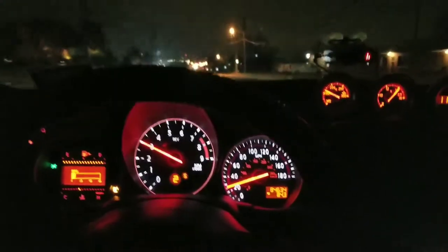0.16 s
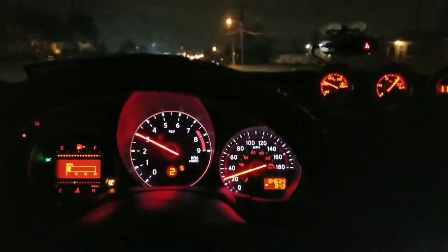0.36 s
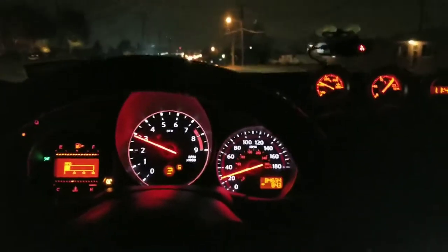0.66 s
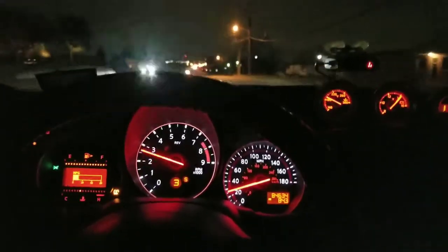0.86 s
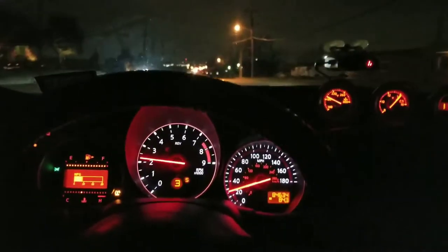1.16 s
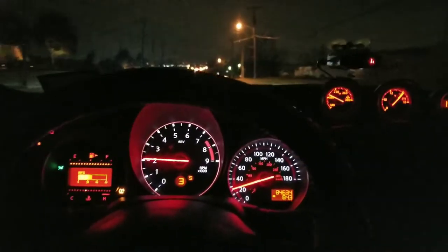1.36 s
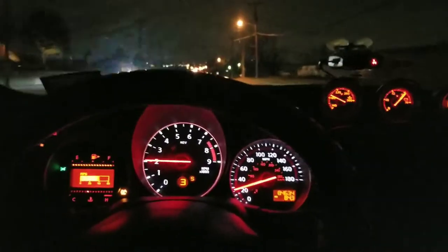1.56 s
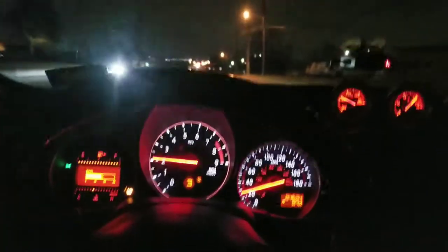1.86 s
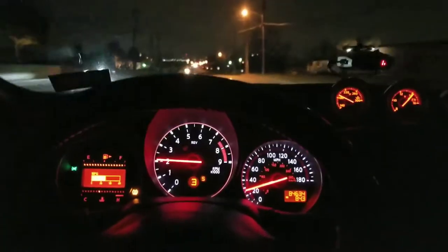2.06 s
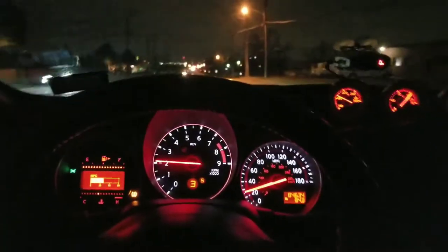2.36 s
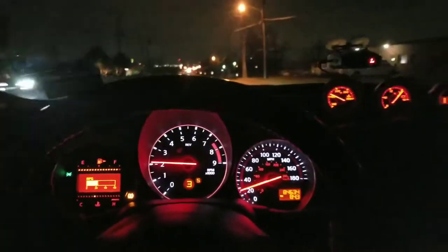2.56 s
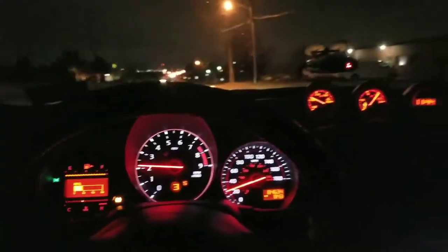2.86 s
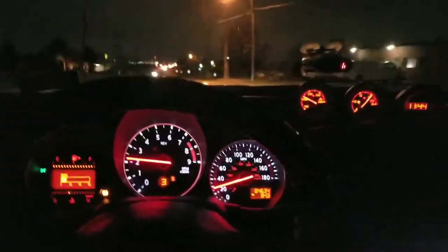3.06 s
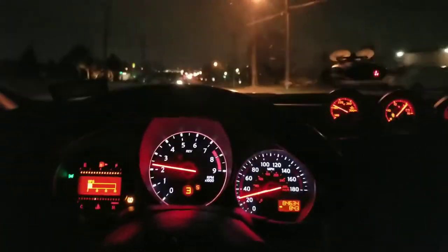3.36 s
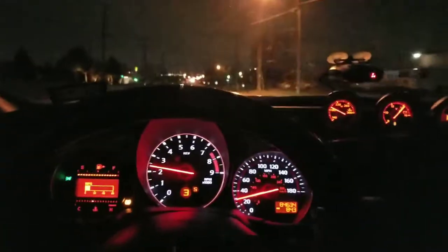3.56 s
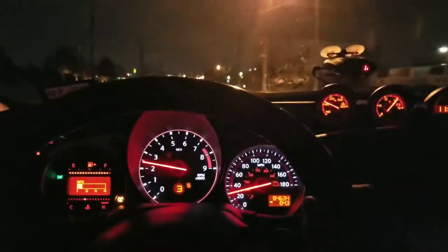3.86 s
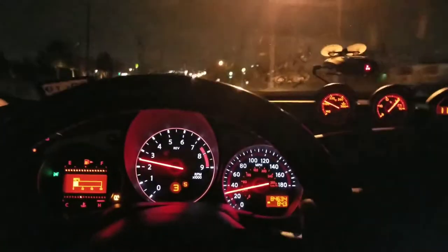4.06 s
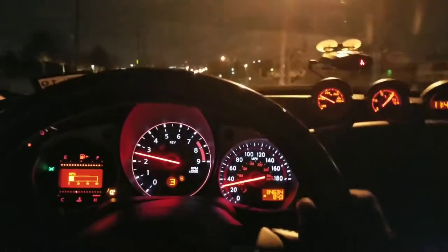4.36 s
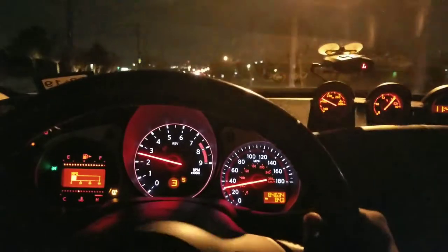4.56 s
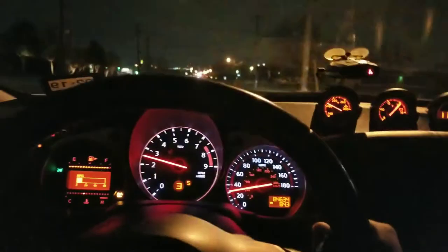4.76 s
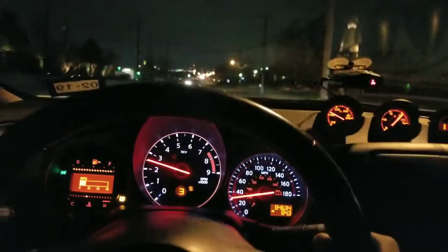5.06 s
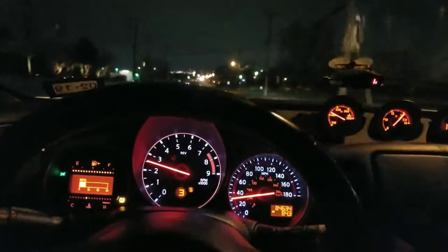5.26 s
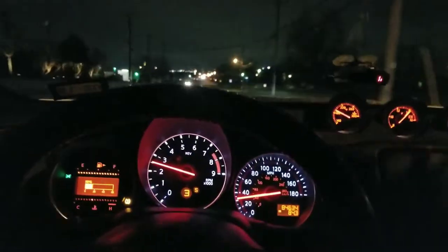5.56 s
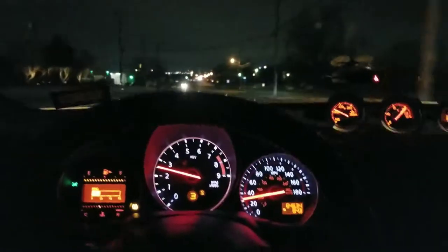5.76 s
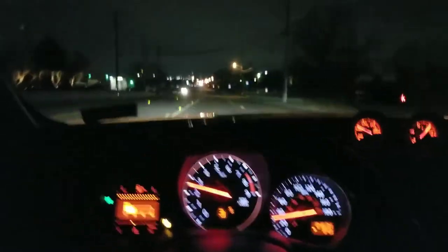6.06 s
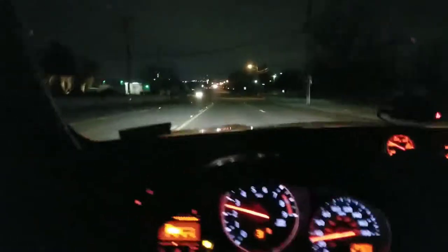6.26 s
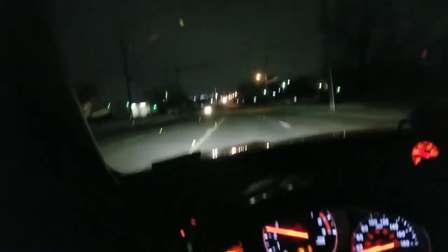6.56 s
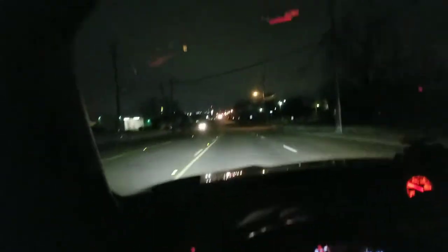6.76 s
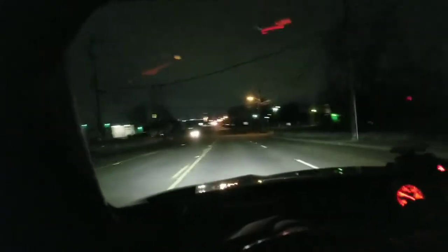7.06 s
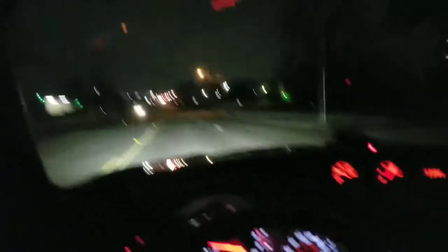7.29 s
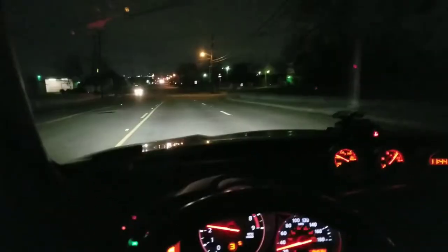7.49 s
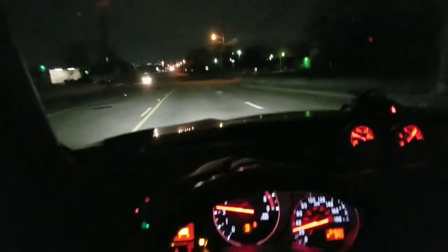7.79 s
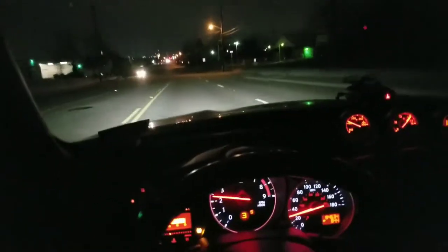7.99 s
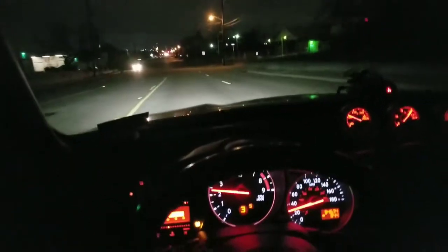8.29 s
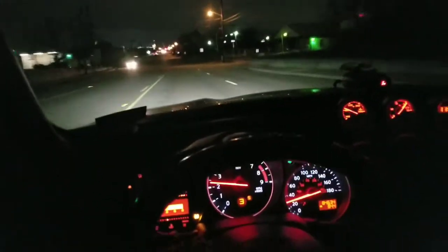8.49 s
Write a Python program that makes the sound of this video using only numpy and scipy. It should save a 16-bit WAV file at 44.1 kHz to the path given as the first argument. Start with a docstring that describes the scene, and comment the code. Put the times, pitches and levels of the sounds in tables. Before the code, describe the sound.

Booming engine drone in a car cabin, pops as revs fall, smooth pull upward, then throttle lift with rasp, trim rattle and handling ticks.

```python
"""A six-cylinder engine with a loud exhaust, heard inside the car: the revs fall through a gear change with pops
in the pipe and a lumpy coast, climb again, then sag slowly off the throttle as the note turns raspy and the trim buzzes.
The engine is a low boom, pulse trains ringing in the pipe, and noise for gas and trim; each pop is a noise burst.
Road rumble and a thin hiss are filtered noise; a hand-held device ticks and rustles now and then in noise bursts."""
import sys
import numpy as np
from scipy import signal
from scipy.fft import rfft, irfft, next_fast_len
from scipy.io import wavfile
from scipy.ndimage import uniform_filter1d, map_coordinates

SR = 44100
rng = np.random.default_rng(int(sys.argv[2]) if len(sys.argv) > 2 else 0)


def decibels_to_gain(level_db):
    """Convert a level in decibels to a linear amplitude gain (20 dB per decade)."""
    exponent = np.asarray(level_db, float) / 20
    return 10 ** exponent


def generate_wav(sig):
    """Save sig (samples, or channels by samples) to the path in sys.argv[1] as 16-bit PCM at SR."""
    pcm = np.round(np.clip(np.atleast_2d(sig).T, -1, 1) * 32767).astype(np.int16)
    wavfile.write(sys.argv[1], SR, pcm)


N = 380583  # length in samples

# relative pulse strength of each cylinder, in firing order
CYLINDERS = [0.84, 1, .4, 0.14, 0.33, 0.014]
# the note is dull under throttle and brightens as it lifts: (t/s, slope above 540 Hz/dB per octave)
BRIGHTNESS = [(0, -7), (.4, -6.5), (.7, -3), (.95, -1), (1.3, -11.5), (2.3, -9.5), (2.7, -7), (3.05, -7),
              (3.2, -14), (4, -11.5), (5, -7.5), (5.5, -5), (5.9, 3), (6.45, 3), (7, .3), (7.6, 0),
              (8.3, -3), (8.45, -7), (8.63, -10)]
# the pulses in the pipe: (t/s, strength/dB, even part over the uneven part/dB)
PULSES = [(0, -35, -12), (.6, -38, -7.5), (1, -26, -8), (1.4, -43.5, -6), (1.9, -47, -6), (2.2, -44, -3.5),
          (2.5, -33, -.5), (2.8, -30.5, 5), (3.02, -32, 2), (3.15, -33.5, -5), (3.5, -29, -9.5),
          (4.2, -32, -11), (5, -32, -8.5), (5.35, -22.5, -3.5), (5.8, -24, -1.5), (6.1, -21, -2.5),
          (6.55, -19, -10.5), (7.2, -22.5, -7), (8, -24.5, -9), (8.63, -23.5, -12)]
# tones that change with speed: (firings per second, throb at 7/6 of the firing rate/dB,
# second harmonic over the pulses/dB, low burble over the pulses/dB); brightness alters throb and burble further
SPEED_TONES = [(95, -41.5, 8.5, 12), (106.7, -42, 6.5, 3.5), (108.6, -36, 0.5, 0.5), (115.6, -29, 1.5, -3),
               (120.9, -28, 0.5, -4), (123.9, -30, -5, -1), (138, -35.5, 6, 4), (147, -46, 6, -2)]
# swells of gas rush and trim buzz, some abrupt, some gradual:
# (t/s, gas level/dB, buzz level/dB, rise over 20 dB/s, fading of the buzz/dB per s)
SURGES = [(.49, -45, -72, .12, 120), (.8, -42, -64, .03, 80), (.93, -45, -49, .12, 73),
          (1.24, -43, -59.5, .5, 200), (2.7, -50, -58, .9, 14), (5.78, -44, -56, .15, 20),
          (5.875, -34.5, -39, .03, 20), (8.399, -36.5, -55.5, .03, 402)]
# resonances of the buzzing trim: (f/Hz, width/Hz, level per pass/dB)
TRIM = [(1860, 640, -1.5), (2600, 560, 3), (3700, 630, -2), (4520, 560, 0.5), (5500, 1500, -1),
        (7380, 1700, -4.5)]


def unit(x):
    """Scaled to rms 1."""
    return x / np.sqrt(np.mean(x ** 2) + 1e-20)


def along(points, hz):
    """Reads (f/Hz, value) points on a log frequency axis."""
    f, v = np.transpose(points)
    return np.interp(np.log(hz + 1), np.log(f + 1), v)


def curves(rows):
    """One value per sample for each column after the time."""
    s, *cols = np.transpose(rows)
    return [np.interp(np.arange(N) / SR, s, c) for c in cols]


def wobble(rate):
    """A smooth random curve, with rate random points a second."""
    return map_coordinates(rng.standard_normal(int(N * rate / SR) + 4), [np.arange(N) * rate / SR])


def hump(s, half):
    """A smooth bell around s, 1 at the top."""
    return np.exp(-((np.arange(N) / SR - s) / half) ** 2)


def swell(s, rise, fall):
    """Level in dB that climbs to 0 at s and sinks again, at the given dB per second."""
    t = np.arange(N) / SR - s
    return np.where(t < 0, rise * t, -fall * t)


def filtered(x, response):
    """x shaped by a complex response of frequency."""
    m = next_fast_len(N + 8192)
    return irfft(rfft(x, m) * response(np.fft.rfftfreq(m, 1 / SR)), m)[..., :N]


def modes(table):
    """Response of a row of resonances that ring only after being struck; neighbours have opposite signs."""
    def response(f):
        total = 0
        for k, (centre, width, db) in enumerate(table):
            damping = 1j * f * width
            total = total + (-1) ** k * decibels_to_gain(db) * damping / (centre * centre - f * f + damping)
        return total
    return response


def muffled(table, top_hz, order):
    """Resonances passed order times in series, behind a two-pole low-pass."""
    return lambda f: modes(table)(f) ** order / (1 + 1j * f / top_hz) ** 2


def spread(mid, other):
    """Left and right from a middle signal and a second signal, which becomes the side."""
    # (f/Hz, side under middle/dB)
    width = [(60, -24), (150, -27), (300, -9), (550, -6.5), (950, -0.5), (2380, 2), (5980, -1), (15000, 0)]
    side = filtered(other, lambda hz: decibels_to_gain(along(width, hz)))
    return np.array([mid + side, mid - side])


def noise(spectrum, gate=1):
    """Coloured noise pair; the middle has rms 1."""
    mid, other = filtered(gate * rng.standard_normal((2, N)), lambda hz: decibels_to_gain(along(spectrum, hz)))
    return spread(mid, other) / np.std(mid)


def in_cabin(x, lag_s):
    """Left and right differ by paths that arrive a little early at one and late at the other."""
    return spread(x, filtered(x, lambda hz: 1j * np.sqrt(2) * np.sin(2 * np.pi * hz * lag_s)))


def orders(turns, weights, response, scatter, waver_db, drift=.25, size=8, count=70):
    """A pulse train repeating once an engine cycle, as its partials: weights by partial, coloured by a response;
    cabin reflections scatter the phases, and uneven burning lets each level and phase waver."""
    cycle = turns[::size] / len(CYLINDERS)  # computed at every size-th sample
    k = np.flatnonzero(weights)[:, None] + 1
    knots = rng.standard_normal((2, len(k), count))
    knots[0] += uniform_filter1d(rng.standard_normal((len(k), count)), size=5) * 2  # slower swells
    when = np.linspace(0, count - 1, len(cycle))
    waver, slip = (np.array([np.interp(when, np.arange(count), row) for row in rows]) for rows in knots)
    hz = k * np.gradient(cycle) * SR / size
    lines = weights[k - 1] * response(hz) * decibels_to_gain(waver_db * waver)
    turn = np.exp(1j * (2 * np.pi * k * cycle + scatter * rng.standard_normal(k.shape) + drift * slip))
    steady = np.real(lines * turn).sum(0) / np.sqrt(np.sum(np.abs(lines) ** 2, 0) / 2)  # rms 1 at every speed
    return signal.resample_poly(steady, size, 1)[:N]


def loaded(load):
    """The pipe resonances at a load from 0 (coasting) to 1 (pulling)."""
    # (f/Hz, width/Hz, level per pass/dB, change under load/dB)
    pipe = [(264.4, 46, -2.5, .1), (302.2, 28, .7, 2.5), (340, 28, -3, 3.5), (384, 23, 1.5, -3.5),
            (419, 24.3, -3.5, 2.5), (500, 24, -.3, -1), (532.4, 24, -4.5, 3.8), (575, 26, -7, -2),
            (618, 24, -3, -4), (641, 22, -6.5, 4), (675, 30, -5, -4), (742, 28, -4, -4.5),
            (860, 45, -9.5, 2), (960, 30, -10, 3), (990, 30, -3.5, -2.5), (1030, 40, -7, 1),
            (1156, 34, -8, .1), (1270, 40, -12, .1), (1385, 45, -11, .1), (1515, 40, -13, .1),
            (1640, 50, -12.5, .1), (1900, 45, -16, .1), (2130, 50, -15, .1)]
    return [(hz, width, db + load * change) for hz, width, db, change in pipe]


def speed_tones(rate):
    """Levels of throb, second harmonic and burble in dB; throb and burble are fuller under throttle."""
    speeds, *levels = np.transpose(SPEED_TONES)
    throb, second, burble = (np.interp(rate, speeds, level) for level in levels)
    pulse_db, _ = curves(PULSES)
    bright, = curves(BRIGHTNESS)
    # brightness is negative under throttle, so these factors raise the level there
    return throb - 0.66 * bright, pulse_db + second, pulse_db + burble - .55 * bright


def gear_chuff():
    """A bell around 6.12 s, after the throttle lifts: stronger gas puffs and tighter pulses."""
    return hump(6.12, .35)


def firing_boom(phase, throb_db, second_db):
    """Tones locked to the firing rate: the main one swollen by the cabin, its second harmonic, a throb and bank tones."""
    # level of the main tone: (t/s, level/dB)
    main = [(0, -13.5), (.45, -11), (.7, -6), (.92, -15), (1.18, -9), (1.3, -25.5), (1.7, -25.5),
            (1.89, -16), (2.1, -22.5), (2.55, -6.5), (2.85, -5), (3.7, -11), (4.7, -13.5), (5.2, -12),
            (5.45, -8.5), (5.95, -9), (6.3, -11.5), (7, -8.5), (8.33, -8.5), (8.63, -12)]
    # the main tone dips briefly: (t/s, change/dB, half length/s)
    dips = [(0.163, -1.5, 0.042), (.505, -7, .012), (5.797, -7.5, .035), (8.404, -4.5, .05)]
    # the two cylinder banks differ, which puts tones halfway between the firing harmonics: (t/s, level/dB)
    banks = [(0, -48), (.55, -40), (.85, -24), (1.1, -32), (1.4, -36), (2.2, -34), (2.8, -28), (3.5, -28),
             (4.5, -31), (5.1, -33), (5.5, -23), (6.1, -25), (6.7, -30), (7.3, -36), (8.63, -35)]
    # added to the bank level at 1/2, 3/2 and 5/2 of the firing rate: (change/dB for each)
    bank_tones = (-11, 0, -11)
    main_db = curves(main)[0] + sum(db * hump(s, half) for s, db, half in dips)
    flutter = decibels_to_gain(0.23 * wobble(25) + 0.67 * wobble(6.1))
    boom = decibels_to_gain(main_db) * flutter * np.cos(phase + 0.086 * wobble(30))
    boom += decibels_to_gain(second_db + 0.63 * wobble(10)) * np.cos(2 * phase + 1.1)
    boom += decibels_to_gain(throb_db + .8 * wobble(6)) * np.cos(phase * 7 / 6)
    bank_db, = curves(banks)
    for half, db in zip((1, 3, 5), bank_tones):
        boom += decibels_to_gain(bank_db + db + .8 * wobble(6)) * np.cos(phase * half / 2 + half)
    return np.sqrt(2) * boom  # a cosine at 0 dB gets rms 1


def cylinder_pattern(k):
    """Strength of each partial: unlike cylinders put partials between the firing harmonics."""
    return np.fft.fft(CYLINDERS)[k % len(CYLINDERS)]


def pipe_note(turns):
    """Exhaust pulses ring the pipe: an even part on the firing harmonics and an uneven part between them."""
    lift_s = 5.85  # the throttle closes for good
    k = np.arange(1, 111)
    firing, upper = k % len(CYLINDERS) == 0, k > 12
    slope = curves(BRIGHTNESS)[0][::8]  # every eighth sample, as orders() works
    pulling = np.arange(len(slope)) * 8 < lift_s * SR
    load = np.clip(-slope / 12, 0, 1) * pulling
    resonances = muffled(loaded(load), top_hz=2500, order=2)

    def pipe(f):
        return resonances(f) * decibels_to_gain(slope * np.log2(np.maximum(f / 540, 1)))

    pulse_db, even_over_uneven_db = curves(PULSES)
    even = orders(turns, 1. * (firing & upper), pipe, scatter=.35, waver_db=1.3)
    scatter = 1.7 - 1.15 * gear_chuff()[::8]  # less scatter makes tighter pulses
    uneven = orders(turns, cylinder_pattern(k) * (~firing & upper), pipe, scatter=scatter, waver_db=1.7)
    return decibels_to_gain(pulse_db + even_over_uneven_db) * even + decibels_to_gain(pulse_db) * uneven


def low_burble(turns, burble_db):
    """The lowest uneven partials excite the air in the cabin."""
    # low air modes: (f/Hz, width/Hz, level per pass/dB)
    cabin = [(135, 41, -2), (181, 39, 0), (212.6, 42, -3.5)]
    k = np.arange(1, 12)
    weights = cylinder_pattern(k) * ((k % 3 != 0) & (k != 7))
    return decibels_to_gain(burble_db) * orders(turns, weights, muffled(cabin, top_hz=400, order=2), scatter=1.5, waver_db=3)


def exhaust_gas(phase):
    """Rushing gas is noise that puffs with each firing and each engine cycle, and rises further in the surges."""
    # (f/Hz, spectrum level/dB)
    spectrum = [(200, -39), (400, -23), (700, -18.5), (1150, -19.5), (1450, -26.5), (1800, -29),
                (2150, -28), (2550, -34), (2900, -45), (6000, -55), (8000, -69.5), (10000, -120)]
    pulse_db, _ = curves(PULSES)
    level = decibels_to_gain(-42.5 + 0.85 * (pulse_db + 30))  # follows the pulse strength
    for s, gas_db, _, rise, fading in SURGES:
        level = level + decibels_to_gain(gas_db + swell(s, 20 / rise, 2.5 * fading))  # gas fades 2.5 times faster than buzz
    each_firing = 0.11 * np.cos(phase - .6)
    each_cycle = (.12 + .5 * gear_chuff()) * np.cos(phase / len(CYLINDERS) - 1.4)
    return level * noise(spectrum, 1 + each_firing + each_cycle)


def trim_buzz():
    """Noise ringing the trim, louder with strong pulses and under throttle, and rising further in the surges."""
    pulse_db, _ = curves(PULSES)
    bright, = curves(BRIGHTNESS)
    level = decibels_to_gain(-61.5 + .45 * (pulse_db + 30) - .6 * bright)
    for s, _, buzz_db, rise, fading in SURGES:
        level = level + decibels_to_gain(buzz_db + swell(s, 20 / rise, fading))
    mid, other = filtered(rng.standard_normal((2, N)), muffled(TRIM, top_hz=5100, order=2))
    return level * spread(mid, other) / np.std(mid)


def loose_rattle(turns):
    """A loose piece of trim slaps once an engine cycle, uneven in time and size; each slap also rings as noise."""
    start_s, level_db, hold_s, fade_s = 5.857, -48.5, .38, .4  # fades 20 dB in fade_s
    slaps, t = np.zeros(N), np.arange(SR // 30) / SR
    strikes = np.flatnonzero(np.diff(np.floor(turns / len(CYLINDERS) + 1 / 3)))
    luck = rng.standard_normal((len(strikes), 2))
    places = np.clip(strikes - 60 + (70 * luck[:, 0]).astype(int), 0, N - 1)
    slaps[places] = decibels_to_gain(2.5 * luck[:, 1])
    decay = decibels_to_gain(-60 * t / .06) * (1 - np.exp(-t / .002))
    shake = 8 * slaps + signal.fftconvolve(slaps, decay)[:N] * rng.standard_normal((2, N))
    # (f/Hz, width/Hz, level per pass/dB)
    piece = muffled([(3900, 400, -8), (4520, 200, 1), (5800, 900, -9)], top_hz=9000, order=2)
    rattle_db = level_db + np.minimum(swell(start_s, 1000, 0), swell(start_s + hold_s, 0, 20 / fade_s))
    return decibels_to_gain(rattle_db) * unit(filtered(shake, piece))


def engine():
    """Boom, pipe note, burble, gas and rattle share one running count of firings, beside the buzz of the trim."""
    # (t/s, firings per second)
    speed = [(0, 146), (.15, 144.9), (.35, 148.5), (.6, 139), (.8, 130.7), (1.2, 104.7), (1.35, 98.6),
             (1.68, 97.8), (1.83, 105.5), (2.02, 100.6), (2.3, 103), (2.45, 103), (2.9, 107.7),
             (3.7, 116.8), (4.5, 123), (4.9, 124.6), (5.9, 124.5), (6.1, 122.3), (6.5, 121.3), (6.9, 118.6),
             (7.5, 116.5), (7.75, 115.2), (8.63, 111.8)]
    rate, = curves(speed)
    turns = np.cumsum(rate) / SR + 1 / 4  # firings so far
    phase = 2 * np.pi * turns
    throb_db, second_db, burble_db = speed_tones(rate)
    tones = firing_boom(phase, throb_db, second_db) + low_burble(turns, burble_db) - pipe_note(turns)
    return in_cabin(tones, .0031) + exhaust_gas(phase) + trim_buzz() + loose_rattle(turns)


def road():
    """Tyres rumble and the body drums, with short low thuds; air and fan hiss lie underneath."""
    # (t/s, rumble level/dB, drumming of the body/dB)
    levels = [(0, -31, -26.5), (1.1, -37.5, -26.5), (2, -33, -26.5), (2.5, -33.5, -22.5), (3.3, -35, -23),
              (4.6, -31.5, -24), (6, -28, -21.5), (7.7, -30, -23.5), (8.63, -34.5, -20)]
    # short low thuds on the body, from the road or from soft exhaust burble: (t/s, level/dB, half length/s)
    thuds = [(.5, -22, .05), (0.873, -19, .09), (1.35, -26, .03), (1.53, -25, .02), (2.3, -24, .03),
             (2.41, -23, .03), (5.175, -20, 0.052), (5.8, -20, .1), (6.15, -22, 0.17), (8.37, -18, .02)]
    # three spectra: (f/Hz, spectrum level/dB)
    rumble_spectrum = [(8.8, -61), (15, -18), (43, -10.5), (70, -12.5), (75, -12), (90, -8), (120, -25.5),
                       (200, -120)]
    body_spectrum = [(90, -26), (130, 4), (150, -2.5), (170, -1.5), (195, -1), (250, -12), (310, -9.5),
                     (350, -17.5), (600, -29), (1000, -77.5)]
    hiss_spectrum = [(180, -26.5), (300, -5), (350, -15.5), (500, -6.5), (769, -18), (953, -9.5),
                     (1220, -23), (2140, -23), (2700, -26), (3230, -34), (5500, -43.5), (7500, -56),
                     (10500, -55), (15500, -60), (17000, -120)]
    rumble_db, body_db = curves(levels)
    rumble = decibels_to_gain(rumble_db + 2.5 * wobble(3) + 0.39 * wobble(7)) * noise(rumble_spectrum)
    drum = decibels_to_gain(body_db) + sum(decibels_to_gain(db) * hump(s, half) for s, db, half in thuds)
    body = drum * decibels_to_gain(1.8 * wobble(12) - 3.0) * noise(body_spectrum)
    hiss = decibels_to_gain(-45.5 + 0.77 * wobble(5.5)) * noise(hiss_spectrum)
    return rumble + body + hiss


def pops():
    """Each pop is a short rough blast that rings the pipe; the strong ones crack out of its end and shake the trim."""
    # unburnt fuel popping in the pipe: (t/s, strength/dB, time to fall 60 dB/s)
    events = [(0.156, -27, .05), (0.419, -19, 0.09), (0.465, -16.5, 0.09), (0.497, -17, 0.051),
              (0.78, -20.5, 0.082), (0.847, -13, 0.08), (0.893, -10.5, 0.09), (0.941, -10.5, 0.1),
              (0.97, -16, 0.07), (1.008, -18, 0.08), (1.1, -21, 0.09), (1.171, -22.5, 0.059),
              (1.34, -26, .05), (8.358, -13, .05)]
    # the open end of the pipe: (f/Hz, width/Hz, level per pass/dB)
    open_end = [(450, 400, 1), (1000, 600, 0), (1900, 600, -4), (2550, 500, -3)]
    inside, outside = np.zeros((2, N + SR))
    t = np.arange(SR // 8) / SR
    for s, db, t60 in events:
        puff = decibels_to_gain(db + 20.5 - 60 * t / t60) * (1 - np.exp(-t / 0.003)) * rng.standard_normal(len(t))
        start = round(s * SR)
        inside[start:start + len(t)] += puff
        outside[start:start + len(t)] += puff * decibels_to_gain(.8 * (db + 11))  # 0.8 dB more crack per dB of pop

    def ring(f):
        twice = muffled(loaded(0), top_hz=4000, order=2)(f)
        once = muffled(loaded(0), top_hz=2500, order=1)(f)
        return decibels_to_gain(-3) * twice + decibels_to_gain(-7) * once

    def crack(f):
        end = muffled(open_end, top_hz=3000, order=2)(f)
        trim = muffled(TRIM, top_hz=5000, order=2)(f)
        return decibels_to_gain(-18) * end + decibels_to_gain(-38) * trim

    return in_cabin(filtered(inside[:N], ring) + filtered(outside[:N], crack), .0023)


def handling_ticks():
    """Taps on the shell of a hand-held device: short noise bursts ringing it, with a treble part of their own."""
    # (t/s, level/dB, treble over the rest/dB, left over right/dB)
    events = [(0.3919, -49, -12.5, 4.5), (1.2838, -38, -13.5, -2.5), (5.752, -45, -15, 4.5),
              (5.7729, -46, -8, 6.5), (5.794, -45, -10, 2.5), (5.8626, -33, -22.5, 2),
              (6.4094, -34.5, -16.5, -1), (6.812, -43.5, -12, 0), (6.88, -36, -15, 2.5),
              (7.8206, -44.5, -12.5, -5.5), (7.8548, -43.5, -18, 1), (7.915, -42, -23, -3.5),
              (7.95, -40.5, -27, 4.5), (8.0087, -34.5, -24.5, 2), (8.0532, -44.5, -7, -3.5),
              (8.116, -40, -14, 0), (8.1766, -37, -19.5, -3), (8.2093, -41.5, -20, -1.5),
              (8.3947, -29, -31.5, -3), (8.5231, -28.5, -24, -1.5), (8.5398, -42.5, -14, 0.5),
              (8.5562, -45.5, -3.5, -6), (8.5749, -39, -3, -8.5)]
    low, high, t = np.zeros((2, N + SR)), np.zeros((2, N + SR)), np.arange(SR // 20) / SR
    for s, db, treble_db, pan_db in events:
        decay = decibels_to_gain(db - 60 * t / 0.04)  # falls 60 dB in 0.04 s
        burst = decay * rng.standard_normal((2, len(t))) * decibels_to_gain([[pan_db / 2], [-pan_db / 2]])
        start = round(s * SR)
        low[:, start:start + len(t)] += burst
        high[:, start:start + len(t)] += burst * decibels_to_gain(treble_db)
    shell = muffled([(2500, 900, 0), (4300, 2200, 3.3)], top_hz=12000, order=2)
    return filtered(low[:, :N], shell) + filtered(high[:, :N], modes([(12000, 6000, 1.5)]))


def rustle():
    """Fingers and cloth rub in strokes: noise made grainy by a fast random level."""
    # (t/s, level/dB, rise over 20 dB/s, fall over 20 dB/s)
    strokes = [(.92, -52.5, .04, .1), (1.2, -59.5, .06, .25), (5.04, -70.5, 0.22, .3),
               (5.38, -62, .2, 0.13), (5.76, -62, .3, .1), (5.88, -51.5, .05, 0.81), (6.41, -54, 0.027, .1),
               (6.88, -58, 0.011, 0.08), (8.58, -42, .02, .05)]
    # (f/Hz, spectrum level/dB)
    cloth = [(3000, -23), (5000, 2), (8000, -6), (10500, 1.5), (13000, -3), (15500, -2)]
    level = sum(decibels_to_gain(db + swell(s, 20 / rise, 20 / fall)) for s, db, rise, fall in strokes)
    return level * noise(cloth, decibels_to_gain(3.5 * wobble(130)))


def scene():
    """All sources; the car sounds lean left or right by band as the cabin colours them."""
    # (f/Hz, left over right/dB)
    lean = [(30, -1.2), (170, -1.1), (290, 0), (640, 2), (1410, 1), (3100, 7), (6820, 1), (15000, -1.5)]
    car = engine() + road() + pops()
    leaning = filtered(car, lambda hz: decibels_to_gain(np.outer([.5, -.5], along(lean, hz))))
    return leaning + handling_ticks() + rustle()


def low_pass(x):
    """Removes everything above the highest recorded frequency."""
    return signal.sosfilt(signal.butter(12, 15820, fs=SR, output="sos"), x)


def record(dry):
    """Peaks round off near full scale."""
    mix = dry / (1 + np.abs(dry) ** 10) ** (1 / 10)
    return low_pass(mix)


dry = scene()
out = record(dry)
generate_wav(out)
```